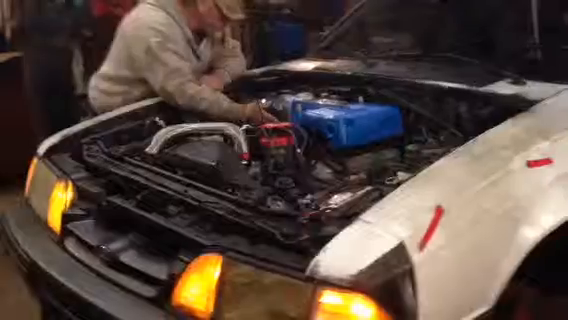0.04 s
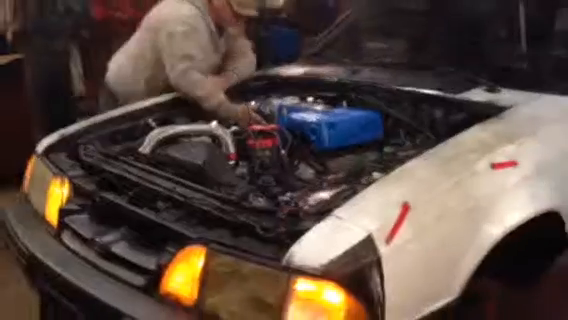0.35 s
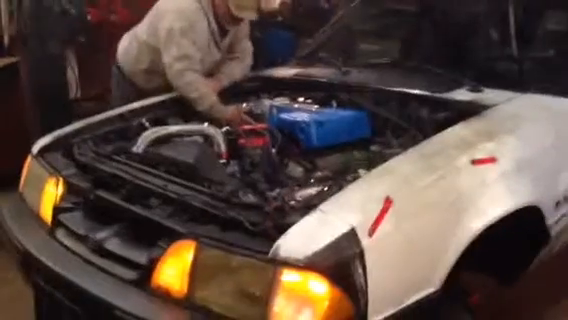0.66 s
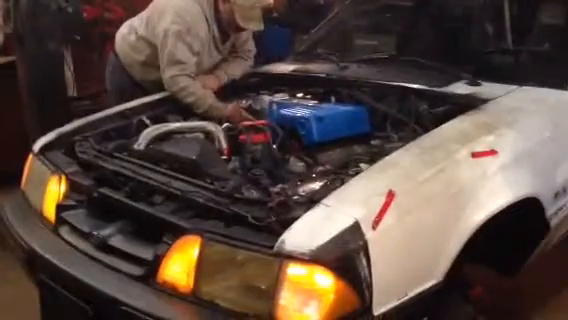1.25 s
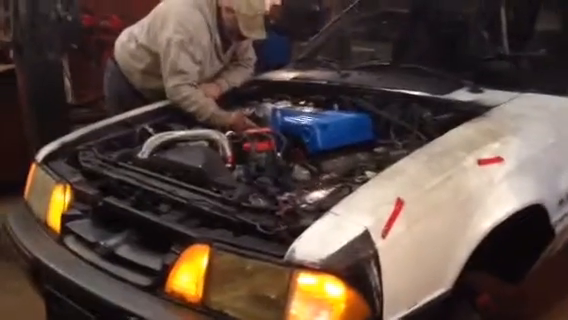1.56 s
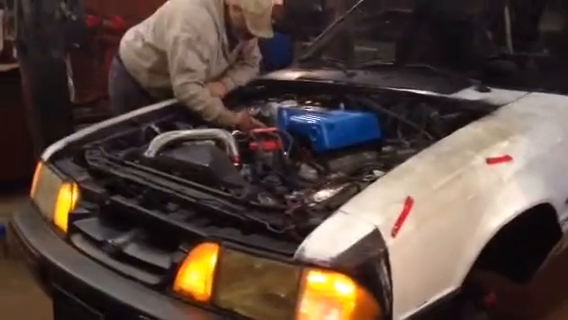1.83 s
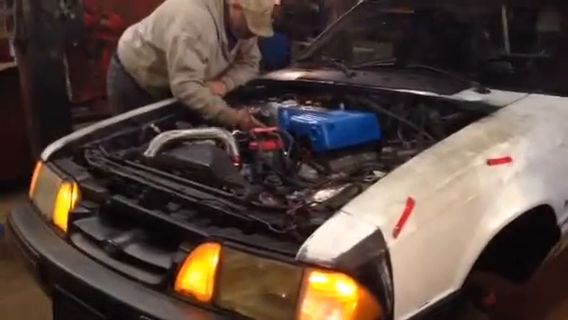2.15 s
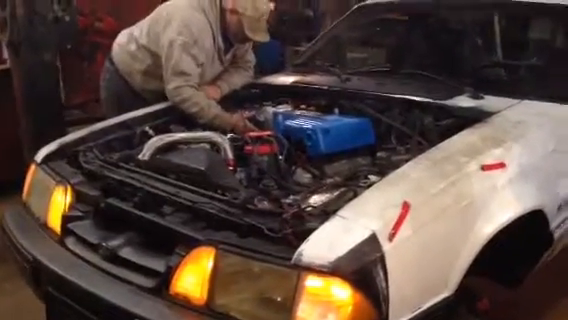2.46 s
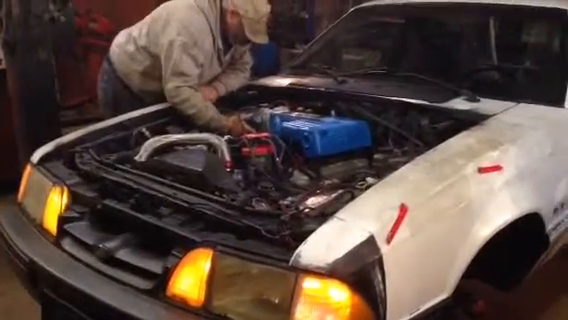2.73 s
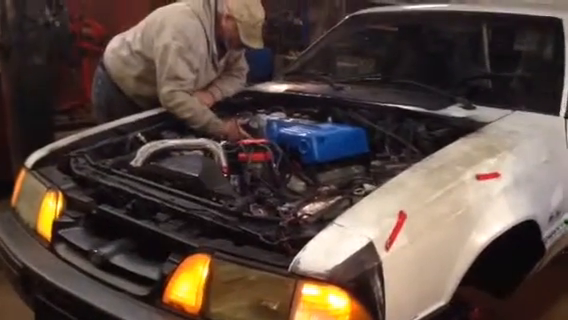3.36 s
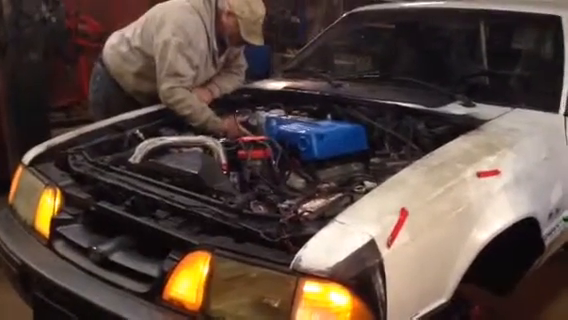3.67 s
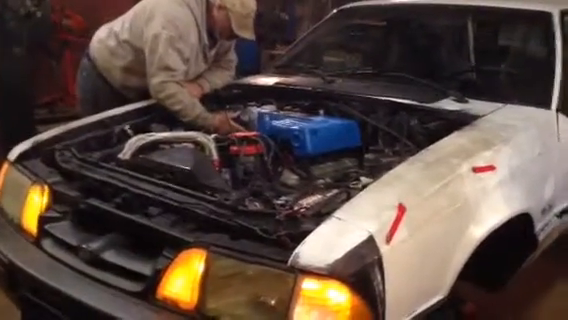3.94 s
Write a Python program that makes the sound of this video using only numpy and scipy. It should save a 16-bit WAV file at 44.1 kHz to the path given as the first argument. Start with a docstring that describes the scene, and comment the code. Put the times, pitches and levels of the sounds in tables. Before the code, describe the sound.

A V8 car engine runs with a deep rumble, revved briefly three times in a garage.

```python
"""A garage: a V8 runs with its bonnet off, the throttle blipped by hand three times.
The exhaust drones at the firing rate and lopes on the other multiples of the engine cycle (orders),
through pipe and room resonances. The block clatters, the valve gear ticks, and the intake gasps
as the throttle opens. A limiter holds the peaks down."""
import sys
import numpy as np
from scipy import signal
from scipy.fft import rfft, irfft
from scipy.io import wavfile
from scipy.ndimage import uniform_filter1d, minimum_filter1d

SR = 44100
rng = np.random.default_rng(int(sys.argv[2]) if len(sys.argv) > 2 else 0)


def store_pcm(level_fs):
    """Save levels as 16-bit WAV."""
    pcm = np.round(np.clip(level_fs, -1, 1) * 32767).astype(np.int16)
    wavfile.write(sys.argv[1], SR, np.atleast_2d(pcm).T)


N = 176400
T = np.arange(N) / SR
CYLINDERS = 8
CYCLE_SWING_DB = 1  # clatter and ticks swell once a cycle

# Engine speed. Each row: time in seconds, firing rate in Hz.
FIRING_HZ = [(0.13, 157.0), (0.28, 151.8), (0.4, 139.8), (1.0, 103.5), (1.09, 101.8), (1.21, 108.9),
             (1.51, 167.1), (1.63, 174.2), (1.9, 157.4), (1.99, 160.0), (2.11, 179.2), (2.29, 192.5),
             (2.38, 193.8), (2.56, 167.1), (2.89, 137.5), (2.98, 137.3), (3.28, 180.5), (3.49, 190.3),
             (3.61, 164.5), (3.7, 163.7), (3.88, 143.1), (3.99, 152.2)]
# Drone at the firing rate. Each row: time in seconds, level in dB.
DRONE_DB = [(0.13, -12), (0.16, -12), (0.49, -21.5), (0.67, -11.5), (0.79, -21), (1.12, -14.5), (1.21, -13),
            (1.48, -11.5), (1.57, -14.5), (1.63, -26), (1.96, -7), (2.11, -17), (2.23, -11.5), (2.5, -25),
            (2.56, -15.5), (3.19, -11), (3.25, -19), (3.4, -11), (3.58, -17), (3.61, -47), (3.64, -19),
            (3.76, -10), (3.85, -17.3), (3.99, -11.0)]
# Resonances of exhaust and garage. Each row: frequency in Hz, gain in dB.
EXHAUST_SPECTRUM = [(20, -28), (38, -36), (54, -3), (74, -17.5), (96, 3), (112, -3), (155, 2.5), (195, -4),
                    (243, 0.5), (315, -10.5), (352, -8), (385, -13), (440, -9.5), (525, -11.5),
                    (620, -21.5), (780, -20.5), (1100, -51), (2500, -77)]
# Orders shaped by uneven cylinders. Each row: order, extra gain in dB.
UNEVEN_ORDERS = [(5, 1), (6, 4), (7, -2), (9, 1), (11, 3), (12, 2), (13, 3), (16, 1), (21, 2)]
# Exhaust bass band. Each row: time in seconds, gain in dB.
BASS_DB = [(.13, -5), (.35, -2), (.68, 2), (.85, -7), (1.3, -4), (1.75, -4), (1.95, -9), (2.15, -8),
           (2.4, -3), (2.75, 0), (3.0, -4), (3.3, -6), (3.55, 0), (3.85, 1), (4, -4)]
# Exhaust bark, its top band. Each row: time in seconds, relative level in dB.
BARK_DB = [(0.15, -22.5), (0.48, -22.5), (1.01, -27), (1.52, -27.5), (1.56, -20), (1.86, -17.5),
           (2.02, -30.5), (2.04, -20), (2.36, -13.5), (2.88, -26.5), (3.26, -23.5), (3.29, -18.5),
           (3.68, -17), (3.72, -27), (3.89, -18.5), (4.0, -23)]
# Pipe and garage modes. Each row: exciting order, mode in Hz, half-width in Hz, peak level in dB.
BOOM_MODES = [(4, 95, 2.6, -20), (9, 148, 8, -22), (12, 154, 5, -22), (12, 290, 4, -26), (16, 231, 6, -24),
              (16, 204, 5, -26), (15, 352, 5, -26.5), (20, 475, 12, -27.5), (25, 528, 15, -26.5)]
# Block clatter. Each row: time in seconds, relative level in dB.
CLATTER_DB = [(0.13, -24), (0.16, -26.5), (0.47, -25), (1.06, -31), (1.29, -21.5), (1.31, -28),
              (1.36, -17.5), (1.45, -25.5), (1.67, -20.5), (1.98, -27.5), (2.08, -19.5), (2.09, -41),
              (2.11, -13), (2.16, -21), (2.67, -19.5), (2.69, -24), (2.71, -23), (3.17, -26), (3.23, -18.5),
              (3.3, -22), (3.61, -19), (4.0, -26.5)]
# Clatter spectrum. Each row: frequency in Hz, relative density in dB.
CLATTER_SPECTRUM = [(200, -8.5), (480, 2.5), (780, 4.5), (900, 2.5), (1030, 3.5), (1300, 0), (1490, 0.5),
                    (1650, -1), (1800, -4), (1950, -2), (2110, -8.5), (2220, -4), (2400, -6), (2750, -13),
                    (3500, -11.5), (4400, -11.5), (6500, -19.5), (15000, -29.5)]
# Sharp modes of the engine bay's metal. Each row: frequency in Hz, relative gain in dB.
METAL_MODES = [(352, 12), (442, 8.5), (779, 4.5), (1023, -14.5), (1480, 1), (1599, -5), (1794, -14),
               (2108, -1), (2422, -5), (2580, -11), (2855, -9), (4060, -25), (4450, -5), (5350, -11)]
# Intake gasps. Each row: peak time in seconds, rise and fall sigmas in seconds, peak level in dB.
INTAKE_GASPS = [(1.19, 0.028, 0.022, -31), (1.285, 0.054, 0.035, -26), (1.365, 0.023, .06, -19.5),
                (2.068, 0.0069, .015, -22), (2.108, 0.0076, 0.074, -27.5), (3.1, 0.07, 0.097, -29),
                (3.221, .006, 0.049, -23.5)]
# Throttle hiss. Each row: frequency in Hz, relative density in dB.
HISS_SPECTRUM = [(600, -18), (1100, -8), (1500, 2), (1900, 9.5), (2350, -7), (3200, 5), (4300, 6.5),
                 (5500, 6), (7200, 1.5), (9500, -22), (15000, -42)]
# Inlet resonances. Each row: frequency in Hz, relative gain in dB.
INLET_MODES = [(1510, 5), (2340, 7), (2960, -9.5), (4350, -3), (5460, -6), (7050, -13)]
# Valve ticking. Each row: time in seconds, relative level in dB.
TICK_DB = [(0.15, -41), (0.43, -40), (1.11, -43.5), (1.25, -38.5), (1.33, -36), (1.36, -28.5), (1.5, -42.5),
           (1.6, -41), (1.84, -40.5), (1.98, -50.5), (2.11, -37.5), (2.17, -45), (2.26, -38), (2.68, -37),
           (2.69, -40), (2.73, -37.5), (2.94, -43.5), (3.16, -41), (3.26, -39), (3.32, -43.5), (3.6, -35),
           (4.0, -44.5)]
# Tick spectrum. Each row: frequency in Hz, relative density in dB.
TICK_SPECTRUM = [(800, -34), (2500, 7.5), (4500, 4.5), (6500, 2.5), (8500, 1.5), (11000, 0), (15000, -3)]


def exhaust(cycles, cycle_hz, bass_below_hz=110, bark_above_hz=310, full_pull_hz_per_s=10):
    """Firing drone, lope and a rumble of gas pulses; the engine runs smoother while it pulls."""
    drone = np.sqrt(2) * from_db(in_time(DRONE_DB)) * np.sin(2 * np.pi * CYLINDERS * cycles)
    rough = lope(cycles, cycle_hz)
    gas_pulses = puffs(CYLINDERS * cycles, pulsing=.47)
    rough += from_db(-19.5) * coloured(gas_pulses, EXHAUST_SPECTRUM)
    bass = lowpass(rough, bass_below_hz)
    mids = lowpass(rough, bark_above_hz) - bass
    bark = rough - bass - mids
    climb_hz_per_s = np.gradient(cycle_hz) * SR
    pull = uniform_filter1d(np.clip(climb_hz_per_s / full_pull_hz_per_s, 0, 1), size=SR // 8)
    bark_db = in_time(BARK_DB)
    bass *= from_db(in_time(BASS_DB))
    mids *= from_db(-4 * pull)
    bark *= from_db(bark_db - bark_db.mean())
    return drone + bass + mids + bark


def lope(cycles, cycle_hz, base_db=-27, wander_depth=.7, wander_hz=1.32):
    """Uneven cylinders sound the orders off the firing rate; each wanders in level and phase."""
    extra_db = dict(UNEVEN_ORDERS)
    lines = np.zeros(N)
    for order in range(2, 41):
        if order == CYLINDERS:
            continue
        wander = 1 + wander_depth * (drift(wander_hz) + 1j * drift(wander_hz))
        wander /= np.sqrt(.5 + wander_depth ** 2)  # unit power per line
        line = np.real(wander * np.exp(2j * np.pi * (order * cycles + rng.random())))
        resonance = at_hz(EXHAUST_SPECTRUM, order * cycle_hz)
        lines += from_db(base_db + extra_db.get(order, 0)) * resonance * line
    return lines


def booms(cycles, cycle_hz):
    """Single orders swell as they sweep through a mode of pipe or garage."""
    lines = np.zeros(N)
    for order, mode_hz, half_width_hz, peak_db in BOOM_MODES:
        line = np.sqrt(2) * np.sin(2 * np.pi * (order * cycles + rng.random()))
        detuning = (order * cycle_hz - mode_hz) / half_width_hz
        lines += from_db(peak_db) * line / (1 + detuning ** 2)
    return lines


def block(cycles, trim_db=-.5):
    """Two knocks a firing rattle the block and ring the metal of the engine bay."""
    knocks = puffs(2 * CYLINDERS * cycles, pulsing=.23, uneven_db=2.38)
    rattle = coloured(knocks, CLATTER_SPECTRUM)
    metal = from_db(-7) * ringing(knocks, METAL_MODES, width_hz=36)
    swing_db = CYCLE_SWING_DB * np.sin(2 * np.pi * cycles)
    return from_db(trim_db + in_time(CLATTER_DB) + swing_db) * (rattle + metal)


def intake(cycles):
    """Air hisses past the opening throttle, gulped by the cylinders, and rasps in the inlet."""
    flow = np.zeros(N)
    for peak_s, rise_s, fall_s, peak_db in INTAKE_GASPS:
        sigma_s = np.where(T < peak_s, rise_s, fall_s)
        flow += from_db(peak_db) * np.exp(-((T - peak_s) / sigma_s) ** 2 / 2)
    gulps = puffs(CYLINDERS * cycles, pulsing=.3, uneven_db=1.5)
    hiss = coloured(gulps, HISS_SPECTRUM)
    rasp = from_db(-3) * ringing(gulps, INLET_MODES, width_hz=130)
    return flow * unit_rms(hiss + rasp)


def valve_gear(cycles, trim_db=7, crank_swing_db=1.4):
    """Sixteen valve ticks a cycle, swelling with each turn of the crank."""
    ticks = puffs(2 * CYLINDERS * cycles, pulsing=.13, uneven_db=2)
    crank_turns = 2 * cycles
    swing_db = crank_swing_db * np.sin(2 * np.pi * crank_turns)
    swing_db += CYCLE_SWING_DB * np.sin(2 * np.pi * cycles)
    return from_db(trim_db + in_time(TICK_DB) + swing_db) * coloured(ticks, TICK_SPECTRUM)


def garage(x, t60_s=.23, tail_db=-8):
    """The walls add a short diffuse tail."""
    tail = rng.standard_normal(SR // 2) * from_db(-60 * T[:SR // 2] / t60_s)
    return x + from_db(tail_db) * signal.fftconvolve(x, tail / np.linalg.norm(tail))[:N]


def puffs(beats, pulsing, uneven_db=0):
    """One noise puff a beat: pulsing sets its decay, uneven_db the spread between puffs."""
    strengths = from_db(uneven_db * rng.standard_normal(4096))
    envelope = strengths[beats.astype(int) % 4096] * np.exp(-2 * pulsing * (beats % 1))
    return envelope * rng.standard_normal(N)


def drift(corner_hz, hop=100):
    """Slow random curve, spread about 1."""
    radius = np.exp(-2 * np.pi * corner_hz * hop / SR)
    noise = rng.standard_normal(N // hop + 1002)
    slow = signal.lfilter([1], [1, -2 * radius, radius ** 2], noise)[1000:]  # skip the settling
    return np.interp(np.arange(N) / hop, np.arange(len(slow)), unit_rms(slow))


def ringing(x, modes, width_hz):
    """Parallel two-pole resonators; unit RMS."""
    radius = np.exp(-np.pi * width_hz / SR)
    ring = np.zeros(N)
    for hz, db in modes:
        feedback = [1, -2 * radius * np.cos(2 * np.pi * hz / SR), radius ** 2]
        ring += from_db(db) * signal.lfilter([1, 0, -1], feedback, x)
    return unit_rms(ring)


def coloured(x, spectrum):
    """Filter by a body's spectrum; unit RMS."""
    bins_hz = np.arange(N // 2 + 1) * SR / N
    return unit_rms(irfft(rfft(x) * at_hz(spectrum, bins_hz), N))


def lowpass(x, hz):
    """Zero-phase low-pass, so bands subtract cleanly."""
    return signal.sosfiltfilt(signal.butter(3, hz, fs=SR, output="sos"), x)


def at_hz(spectrum, hz):
    """A spectrum's gain, interpolated over log frequency."""
    points_hz, points_db = np.transpose(spectrum)
    return from_db(np.interp(np.log(np.maximum(hz, 1)), np.log(points_hz), points_db))


def in_time(rows):
    """A control curve at every sample."""
    return np.interp(T, *np.transpose(rows))


def unit_rms(x):
    """Scale to RMS 1."""
    return x / np.sqrt(np.mean(x ** 2) + 1e-20)


def from_db(db):
    """Decibels to gain."""
    return 10 ** (np.asarray(db) / 20)


def scene():
    """One engine speed drives every layer; mono."""
    cycle_hz = in_time(FIRING_HZ) / CYLINDERS
    cycles = np.cumsum(cycle_hz) / SR
    engine_bay = garage(block(cycles)) + intake(cycles) + valve_gear(cycles)
    return (exhaust(cycles, cycle_hz) + booms(cycles, cycle_hz) + engine_bay)[None]


def record(dry):
    """The sound sets in, a fast limiter holds the peaks, the top is cut."""
    start_s, fade_s, cutoff_hz = .119, .002, 15300
    ceiling, release_db_per_s, window_samples = .72, 80, 89
    x = dry[0] * np.clip((T - start_s) / fade_s, 0, 1)
    over_db = 20 * np.log10(np.maximum(np.abs(x) / ceiling, 1))
    cut_db = np.maximum.accumulate(over_db + release_db_per_s * T) - release_db_per_s * T
    held_gain_db = minimum_filter1d(-cut_db, size=window_samples)
    limited = x * from_db(uniform_filter1d(held_gain_db, size=window_samples))
    top_cut = signal.ellip(12, .1, 90, cutoff_hz, fs=SR, output="sos")
    return signal.sosfilt(top_cut, limited)[None]


dry = scene()
out = record(dry)
store_pcm(out)
```